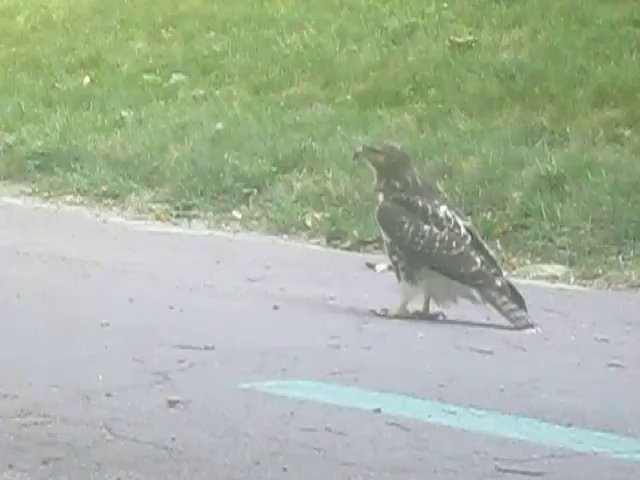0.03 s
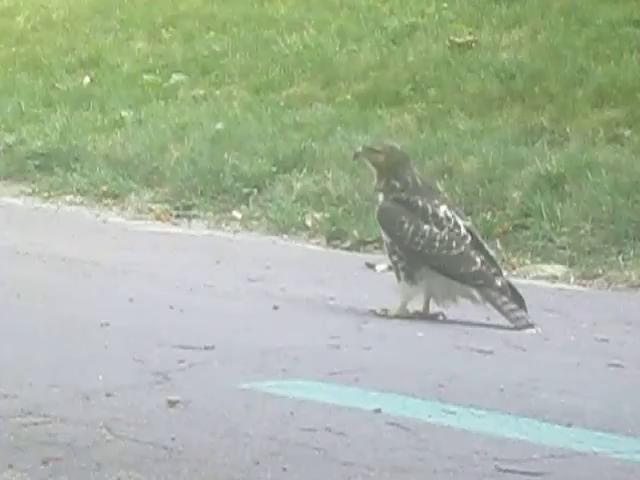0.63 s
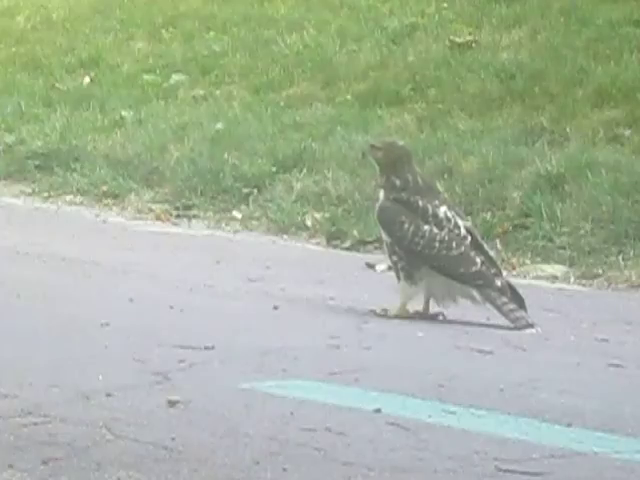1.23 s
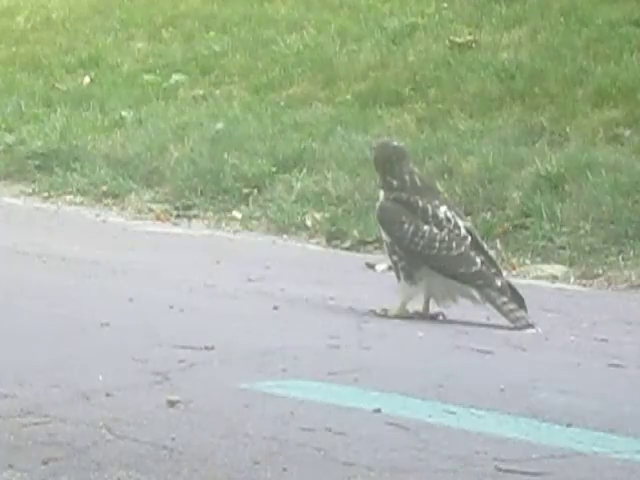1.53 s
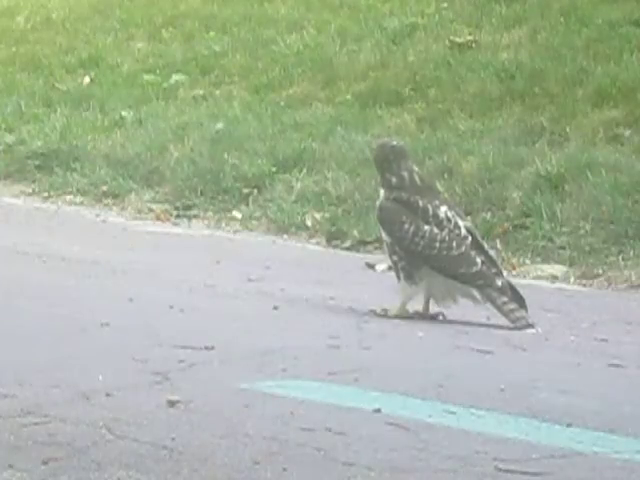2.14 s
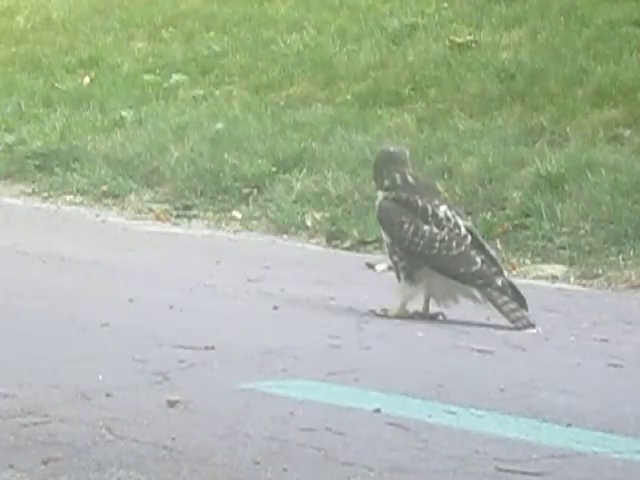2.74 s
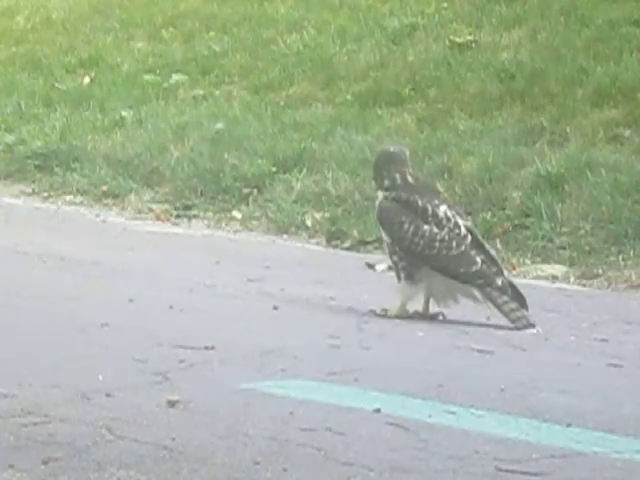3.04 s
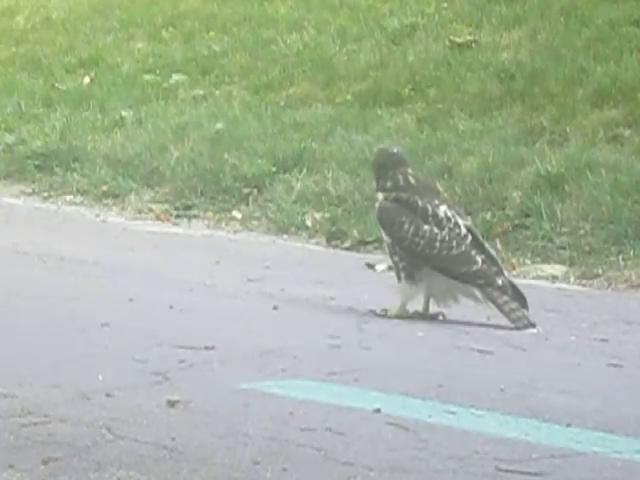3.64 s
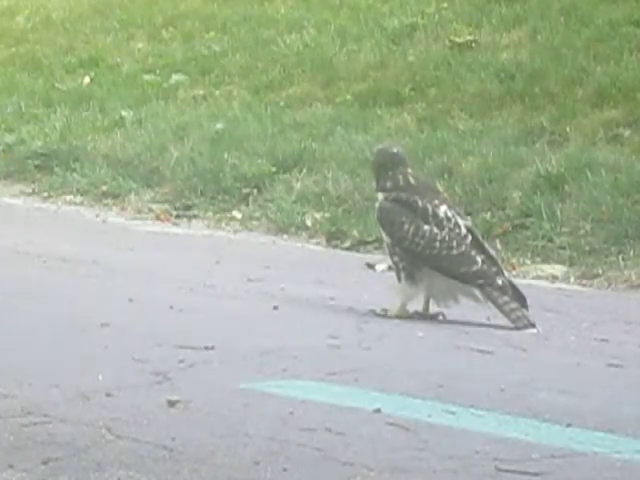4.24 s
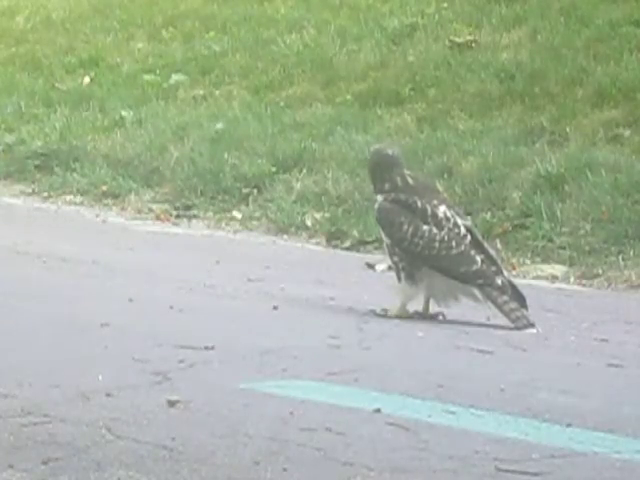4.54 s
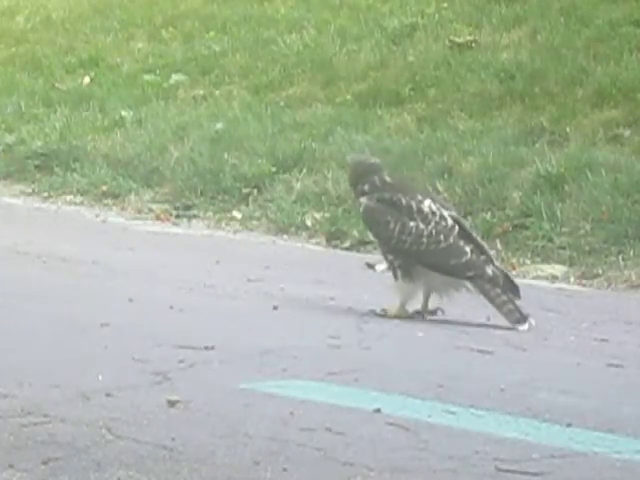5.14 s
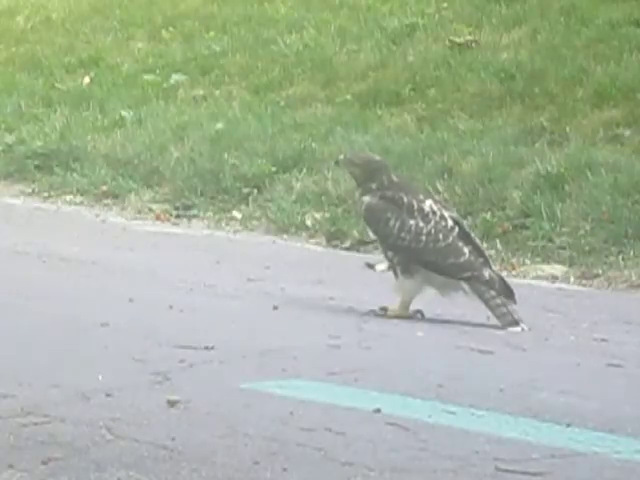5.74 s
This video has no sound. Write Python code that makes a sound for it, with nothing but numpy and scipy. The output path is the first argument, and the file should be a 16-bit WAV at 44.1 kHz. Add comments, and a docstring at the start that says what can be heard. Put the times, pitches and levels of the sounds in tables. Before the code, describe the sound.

Two crickets chirp in quick pulsed trills over distant traffic and light wind, with faint birds and small knocks on the microphone.

```python
"""Crickets beside a park path.

Two crickets chirp in the grass, scraping wing on wing, over distant traffic and an engine's drone.
Small birds whistle and chip far off among the trees; light wind rumbles at the microphone.
Close by: short rustles of cloth, and small knocks and brushes of a hand on the camera."""
import sys
import numpy as np
from scipy import signal
from scipy.fft import rfft, irfft
from scipy.io import wavfile
from scipy.ndimage import uniform_filter1d

SR = 44100
rng = np.random.default_rng(int(sys.argv[2]) if len(sys.argv) > 2 else 0)


def to_wav(s):
    """Save 16-bit WAV."""
    ch = np.atleast_2d(s).T  # columns
    pcm = np.round(np.clip(ch, -1, 1) * 32767)  # PCM
    wavfile.write(sys.argv[1], SR, pcm.astype(np.int16))


N = 255780
TIME_S = np.arange(N) / SR

# Table levels are relative: gains and filters follow.
# noise spectra: freq_hz, density_db
TRAFFIC_SPECTRUM = [(30, -3), (90, 10.5), (140, 11.5), (200, 4.5), (320, -2), (500, -2), (850, 0),
                    (1100, -3), (1450, -8), (2600, -12), (3700, -12), (5600, -17), (8000, -35),
                    (13000, -49.5)]
WIND_SPECTRUM = [(10, -14), (25, -18), (45, 4.5), (75, 2.5), (110, -6), (200, -16), (400, -29),
                 (1500, -67.5)]
CHORUS_SPECTRUM = [(3900, -50), (4400, -18.5), (4850, 2.5), (5300, -1), (5500, -12), (5780, -8),
                   (6200, -22), (8000, -56)]
CLOTH_SPECTRUM = [(100, -8), (300, 7), (700, 1), (2000, 4), (3200, 0.5), (5000, 0), (7000, -10.5),
                  (9000, -20.5), (12000, -42), (16000, -50)]
# road and engine envelopes: time_s, level_db
TRAFFIC_LEVELS = [(0.06, -41), (0.92, -40.5), (1.24, -40), (3.19, -38.5), (3.53, -40), (5.8, -39.5)]
ENGINE_LEVELS = [(0, -51), (1.7, -48), (2.3, -40), (2.7, -32), (3.0, -49), (3.35, -30), (3.7, -43),
                 (4.5, -38.5), (5.0, -34.5), (5.5, -28.5), (5.8, -32)]
# swells of wind, cloth and fingers: peak_s, level_db, length_s
WIND_GUSTS = [(.82, -30.5, .25), (1.96, -29, 0.17), (2.42, -34, 0.11), (3.22, -34, .12), (3.39, -27, .08),
              (4.25, -31.5, 0.37), (4.83, -31.5, 0.093), (5.49, -29, .2)]
CLOTH_RUBS = [(.715, -32.5, 0.18), (.93, -37, .04), (1.65, -43, 0.21), (2.26, -39, 0.051), (4.2, -50, 0.41)]
FINGER_BRUSHES = [(2.25, -64, .08), (3.0, -68, 0.31), (4.18, -60, 0.41)]
# bird whistles: start_s, length_s, level_db, start_hz, bend_hz, end_hz
BIRD_WHISTLES = [(.378, .021, -34.5, 5430, 7300, 7550), (3.61, .27, -44.5, 3530, 3540, 3720),
                 (4.38, .15, -44.5, 3720, 3590, 3660), (4.49, .21, -45, 3670, 3690, 3660),
                 (4.46, .44, -50, 8750, 9400, 7350), (4.54, .13, -47, 2860, 2860, 2840),
                 (5.09, .21, -40.5, 3150, 3450, 3280), (5.22, .1, -40, 3180, 3110, 3000),
                 (5.66, .14, -40, 3130, 3060, 3100)]
# buzzy bird calls: middle_s, level_db, pitch_hz, glide_hz, length_s
BIRD_CHIPS = [(0.938, -46, 7600, 300, 0.022), (3.97, -51, 8050, -800, 0.019),
              (5.01, -52, 8100, -300, 0.052), (5.101, -37, 3750, -250, 0.021),
              (5.323, -49, 6900, 1800, 0.029)]
# knocks on the casing: start_s, level_db, pitch_hz
HAND_KNOCKS = [(0.905, -14, 270), (.943, -19, 1010), (1.313, -26, 3570), (1.666, -20.5, 4000),
               (1.699, -27, 2926), (2.292, -18, 1080), (2.5384, -21, 1800), (2.54, -14, 910),
               (3.005, -29, 5950), (3.560, -33, 7370), (4.565, -28, 3900), (4.897, -27, 4110)]
# one closing of the wings: from_middle_s, pitch_hz, level_db
FAR_STROKE = [(-.013, 4760, 3), (-.008, 4880, -6.5), (-.004, 4900, 1.5), (0, 4760, 2), (.004, 4640, -1),
              (.008, 4450, -6), (0.01, 4330, -39)]
NEAR_STROKE = [(-.014, 5300, -24), (-.008, 5365, -8), (-.004, 5285, -1.5), (0, 5115, 0), (.004, 4910, -1.5),
               (.008, 4700, -10), (.012, 4500, -26)]
# far cricket's chirps: first_stroke_s, stroke_count
FAR_CHIRPS = [(0.21, 4), (.499, 4), (.794, 4), (1.064, 4), (1.382, 4), (1.683, 4), (1.955, 5), (2.261, 5),
              (2.581, 4), (2.859, 4), (3.16, 5), (3.456, 4), (3.732, 5), (4.073, 4), (4.377, 4), (4.682, 3),
              (4.942, 4), (5.238, 4), (5.552, 4)]
# near cricket's chirps: first_stroke_s, level_db
NEAR_CHIRPS = [(-.024, -28), (0.35, -23.5), (.657, -24.5), (.93, -25), (1.277, -26), (1.595, -24.5),
               (1.940, -25.5), (2.285, -22.5), (2.595, -24.5), (3.06, -24), (3.323, -24), (3.622, -25.5),
               (3.897, -25.5), (4.561, -25.5), (4.822, -25.5), (5.361, -26.5), (5.578, -26.5), (5.790, -25)]


def amp(db):
    """Decibels to gain."""
    return 10 ** (np.asarray(db) / 20)


def unit_rms(x):
    """Scale to rms 1."""
    return x / np.sqrt(np.mean(np.abs(x) ** 2) + 1e-20)


def curve(rows):
    """Straight lines through (time_s, value) rows."""
    return np.interp(TIME_S, *np.transpose(rows))


def add(mix, start_s, sound):
    """Mix a sound in, cropped at both ends of the mix."""
    at = round(start_s * SR)
    sound = sound[max(-at, 0):]
    part = mix[max(at, 0):][:len(sound)]
    part += sound[:len(part)]


def butter(x, order, edges_hz, kind):
    """Butterworth filter."""
    return signal.sosfilt(signal.butter(order, edges_hz, kind, fs=SR, output="sos"), x)


def drift(rate_hz):
    """Smooth random motion, rms 1, rolling off above rate_hz."""
    hz = np.fft.rfftfreq(N, 1 / SR)
    return unit_rms(irfft(rfft(rng.standard_normal(N)) * np.exp(-(hz / rate_hz) ** 2), N))


def flutter(smooth_samples):
    """Short stretch of fast random motion, rms 1."""
    window = signal.windows.hann(smooth_samples)
    return unit_rms(signal.fftconvolve(rng.standard_normal(4096), window, "same"))


def noise(spectrum, patchy_db):
    """Coloured noise, rms 1; level drifts in patches of time and frequency."""
    hz = np.fft.rfftfreq(2048, 1 / SR)
    real, imag, patches = rng.standard_normal((3, N // 512 + 5, len(hz)))
    patches = uniform_filter1d(patches, size=6, axis=0)
    patches = unit_rms(uniform_filter1d(patches, size=20, axis=1))
    freq_hz, density_db = np.transpose(spectrum)
    colour_db = np.interp(np.log(hz + 1), np.log(freq_hz), density_db)
    frames = (real + 1j * imag) * amp(colour_db + patchy_db * patches)
    return unit_rms(signal.istft(frames.T, nperseg=2048, noverlap=1536)[1][:N])


def swells(rows, rise_share=.37):
    """Envelope of soft events: quick rise, slower fall, summed in power."""
    power = np.zeros(N)
    for peak_s, level_db, length_s in rows:
        u = (TIME_S - peak_s) / length_s
        rise = np.exp(-(u / rise_share) ** 2 / 2)
        fall = 1 / np.cosh(np.minimum(abs(u) / (1 - rise_share), 20))
        power += (amp(level_db) * np.where(u < 0, rise, fall)) ** 2
    return np.sqrt(power)


def scatter(x, t60_s, delay_s, echoes_per_s=4000, turn_hz=.75):
    """Echoes from trees and ground; moving air slowly crossfades three patterns."""
    t = np.arange(SR // 2) / SR
    taps = rng.standard_normal((3, len(t))) * (rng.random((3, len(t))) < echoes_per_s / SR)
    taps *= (t > delay_s) * amp(-60 * t / t60_s)
    taps /= np.linalg.norm(taps, axis=1, keepdims=True)
    fades = np.cos(np.pi * (2 * turn_hz * TIME_S + np.arange(3)[:, None] / 3)) * np.sqrt(2 / 3)
    return signal.fftconvolve(x * fades, taps, axes=1).sum(0)[:N]


def traffic(gain_db=8):
    """Tyre roar and exhaust rumble from a distant road."""
    return amp(curve(TRAFFIC_LEVELS) + gain_db) * noise(TRAFFIC_SPECTRUM, patchy_db=.93)


def engine(firing_hz=104, waver_share=.0121, octave_db=-15, swell_db=2):
    """Firing note of one far engine, fading in and out on the air."""
    phase = 2 * np.pi * np.cumsum(firing_hz * (1 + waver_share * drift(rate_hz=4.8))) / SR
    level_db = curve(ENGINE_LEVELS) + swell_db * drift(rate_hz=4.2)
    return amp(level_db) * (np.sin(phase) + amp(octave_db) * np.sin(2 * phase))


def wind(gain_db=-1, breeze_db=-44):
    """Soft gusts on the microphone over a light breeze."""
    envelope = np.hypot(amp(breeze_db), swells(WIND_GUSTS))
    return amp(gain_db) * envelope * noise(WIND_SPECTRUM, patchy_db=.5)


def cricket_chorus(level_db=-49, flutter_db=3):
    """Many far crickets, blended into one band of noise."""
    return noise(CHORUS_SPECTRUM, patchy_db=4.5) * amp(level_db + flutter_db * drift(rate_hz=38))


def bird_whistles(gain_db=-2.5, echo_db=.5, bend_power=1.3, dull_above_hz=6530, dull_db_per_khz=-4.5):
    """Gliding, nearly pure tones echoing among trees; the highest lose level on the way."""
    out = np.zeros(N)
    wobble = 1 + .004 * drift(rate_hz=80)
    for start_s, length_s, level_db, *contour_hz in BIRD_WHISTLES:
        t = np.arange(0, length_s, 1 / SR)
        progress = (t / length_s) ** bend_power  # bend falls after midway
        pitch_hz = np.polyval(np.polyfit([0, .5, 1], contour_hz, 2), progress)
        pitch_hz *= np.interp(start_s + t, TIME_S, wobble)
        dull_db = dull_db_per_khz * np.maximum(pitch_hz - dull_above_hz, 0) / 1000
        envelope = amp(level_db + dull_db) * signal.windows.tukey(len(t), .22)
        add(out, start_s, envelope * np.sin(2 * np.pi * np.cumsum(pitch_hz) / SR))
    return amp(gain_db) * (out + amp(echo_db) * scatter(out, t60_s=.6, delay_s=.003))


def bird_chips(buzz_depth_hz=300, echo_db=-5):
    """Quick calls; fast pitch flutter makes them lisp."""
    out = np.zeros(N)
    for middle_s, level_db, pitch_hz, glide_hz, length_s in BIRD_CHIPS:
        u = np.linspace(-.5, .5, int(length_s * SR))
        sweep_hz = pitch_hz + glide_hz * u + buzz_depth_hz * flutter(70)[:len(u)]
        tone = np.sin(2 * np.pi * np.cumsum(sweep_hz) / SR)
        add(out, middle_s - length_s / 2, amp(level_db) * np.cos(np.pi * u) * tone)
    return out + amp(echo_db) * scatter(out, t60_s=.31, delay_s=.0046)


def finger_brushes(band_hz=(5400, 8400)):
    """Fingers slide on the casing: thin hiss."""
    hiss = butter(rng.standard_normal(N), 3, band_hz, "bandpass")
    return swells(FINGER_BRUSHES) * unit_rms(hiss)


def cloth_rustle(grain_db=.6):
    """Cloth rubs close by in small, uneven catches."""
    rub = noise(CLOTH_SPECTRUM, patchy_db=.8)
    return swells(CLOTH_RUBS) * unit_rms(rub * amp(grain_db * drift(rate_hz=150)))


def hand_knocks(tick_gain=.18, rise_s=.00017, decay_at_1khz_s=.0015, damping_power=.4, cutoff_hz=6300):
    """Each touch: a dry tick and a few cycles of the damped casing."""
    out, t = np.zeros(N), np.arange(2048) / SR
    for start_s, level_db, pitch_hz in HAND_KNOCKS:
        decay_s = decay_at_1khz_s * (1000 / pitch_hz) ** damping_power
        tick = unit_rms(butter(rng.standard_normal(len(t)), 2, min(2.3 * pitch_hz, 7000), "lowpass"))
        ring = np.sin(2 * np.pi * pitch_hz * t)
        envelope = (1 - np.exp(-(t / rise_s) ** 2)) * np.exp(-t / decay_s)
        add(out, start_s, amp(level_db) * envelope / envelope.max() * (ring + tick_gain * tick))
    return butter(out, 4, cutoff_hz, "lowpass")


def wing_stroke(shape, shift_hz, roughness, uneven_db=.9, wander_hz=14):
    """Scraper runs along the file; the tone sinks as the stroke slows. No two strokes alike."""
    time_s, pitch_hz, level_db = np.transpose(shape)
    t = np.arange(time_s[0], time_s[-1], 1 / SR)
    teeth, slip = flutter(130)[:len(t)], flutter(130)[:len(t)]
    force, tuning, lean = rng.standard_normal(3)
    sweep_hz = np.interp(t, time_s, pitch_hz) + shift_hz + wander_hz * tuning
    phase = 2 * np.pi * np.cumsum(sweep_hz) / SR + roughness * slip
    pressure_db = uneven_db * (force + 2 * lean * np.linspace(-1, 1, len(t)))
    envelope = amp(np.interp(t, time_s, level_db) + pressure_db) * signal.windows.tukey(len(t), .2)
    return envelope * (1 + roughness * teeth) * np.sin(phase)


def far_cricket(gap_s=.0335, slowing_s=.0014, first_db=-3, lead_s=.031, lead_db=-12,
                base_db=-34.5, growth_db_per_s=.32, direct_db=-1.5, echo_db=-4):
    """Lower, softer cricket: a faint, flat lead-in, then strokes that slow through the chirp."""
    out = np.zeros(N)
    for chirp_s, stroke_count in FAR_CHIRPS:
        start_s = chirp_s + FAR_STROKE[0][0]
        level_db = base_db + growth_db_per_s * chirp_s
        lead = wing_stroke(FAR_STROKE, shift_hz=-200, roughness=.23)
        add(out, start_s - lead_s, amp(level_db + lead_db) * lead)
        for k in range(stroke_count):
            stroke = wing_stroke(FAR_STROKE, shift_hz=0, roughness=.12)
            at_s = start_s + k * gap_s + slowing_s * k * (k - 1) / 2
            add(out, at_s, amp(level_db + first_db * (k == 0)) * stroke)
    return amp(direct_db) * out + amp(echo_db) * scatter(out, t60_s=.45, delay_s=.003)


def near_cricket(gap_s=.033, slowing_s=.0018, first_db=-4, first_shift_hz=-50,
                 grass_db=-1.5, trees_db=-5, top_band_hz=(5280, 5470)):
    """Three strokes a chirp, the first weak; grass scatters a slowly growing share."""
    direct, scattered = np.zeros((2, N))
    for chirp_s, level_db in NEAR_CHIRPS:
        start_s = chirp_s + NEAR_STROKE[0][0]
        direct_share = .66 - .035 * chirp_s
        for k in range(3):
            stroke = wing_stroke(NEAR_STROKE, first_shift_hz * (k == 0), roughness=.21)
            stroke *= amp(level_db + first_db * (k == 0))
            at_s = start_s + k * gap_s + slowing_s * k * (k - 1) / 2
            add(direct, at_s, np.sqrt(direct_share) * stroke)
            add(scattered, at_s, np.sqrt(1 - direct_share) * stroke)
    grass = scatter(scattered, t60_s=.28, delay_s=.004)
    # top of each sweep carries furthest, returns from the trees
    sweep_top = butter(scattered, 3, top_band_hz, "bandpass")
    trees = scatter(2 * sweep_top, t60_s=.45, delay_s=.055)
    return direct + amp(grass_db) * grass + amp(trees_db) * trees


def scene(side_db=-21):
    """Near-mono mix; only faint cricket echoes differ between channels."""
    crickets = near_cricket() + far_cricket() + cricket_chorus()
    background = bird_whistles() + bird_chips() + traffic() + engine() + wind()
    handling = hand_knocks() + cloth_rustle() + finger_brushes()
    mid = crickets + background + handling
    side = amp(side_db) * scatter(crickets, t60_s=.074, delay_s=.001)
    return np.array([mid + side, mid - side])


def record(dry, hiss_db=-66, hiss_from_hz=3200, start_s=.036, cutoff_hz=15800):
    """Recorder: faint high hiss per channel, 1 ms fade-in at start_s, band limit."""
    hiss = butter(rng.standard_normal(dry.shape), 4, hiss_from_hz, "highpass")
    fade_in = np.clip((TIME_S - start_s) * 1000, 0, 1)
    lowpass = signal.firwin(511, cutoff_hz, window=("kaiser", 9), fs=SR)
    return signal.oaconvolve((dry + amp(hiss_db) * hiss) * fade_in, lowpass[None], "same")


dry = scene()
out = record(dry)
to_wav(out)
```